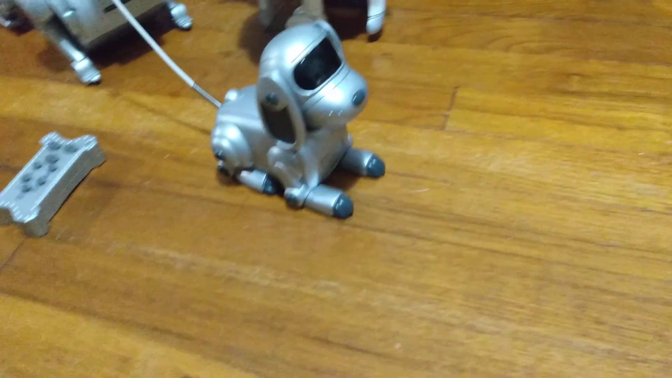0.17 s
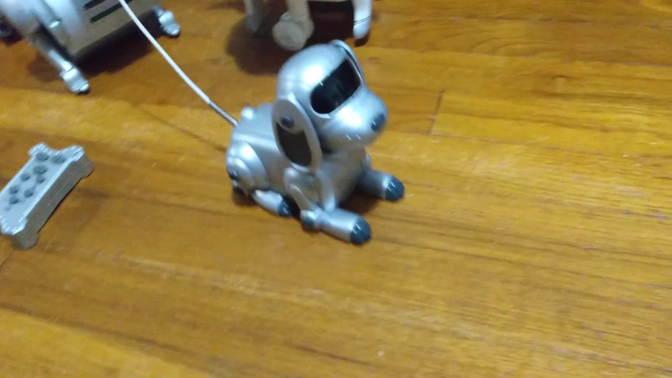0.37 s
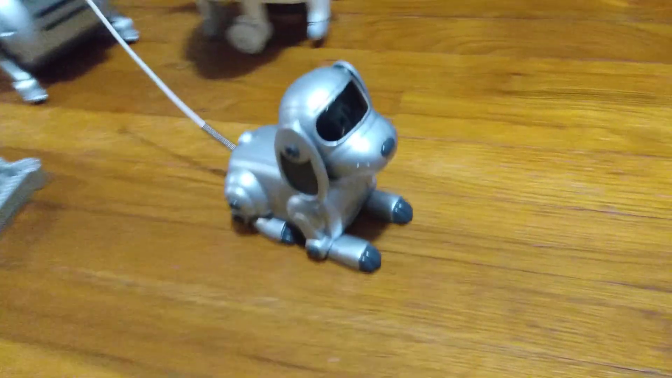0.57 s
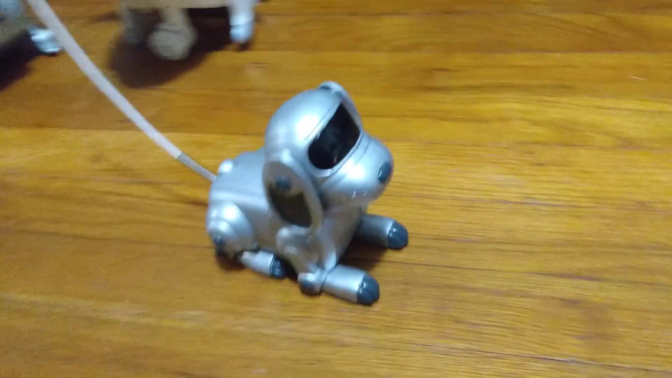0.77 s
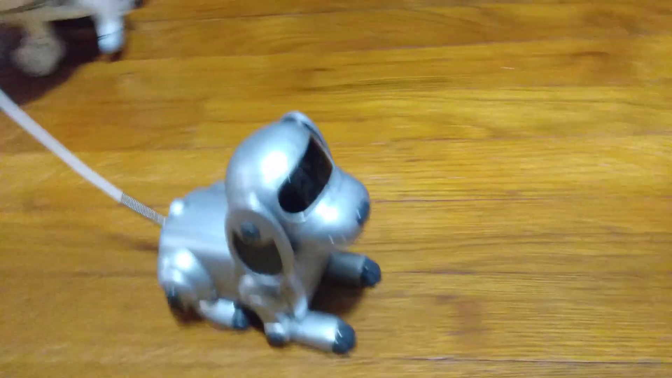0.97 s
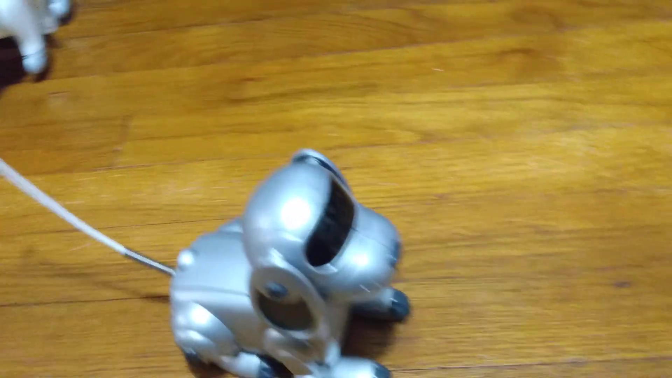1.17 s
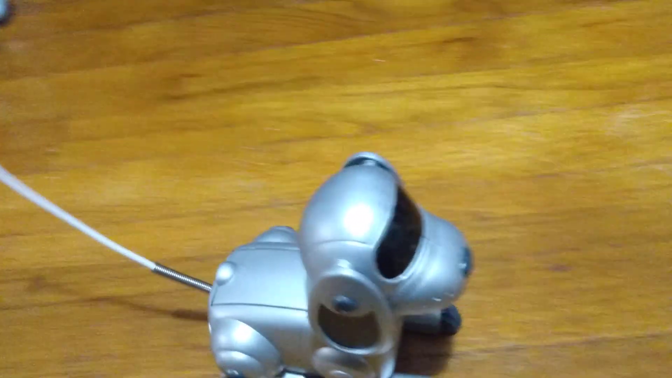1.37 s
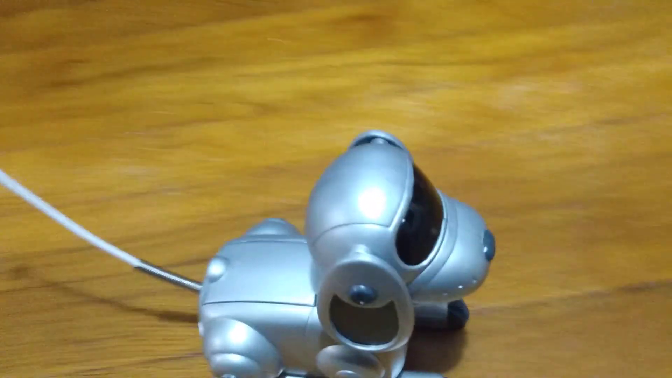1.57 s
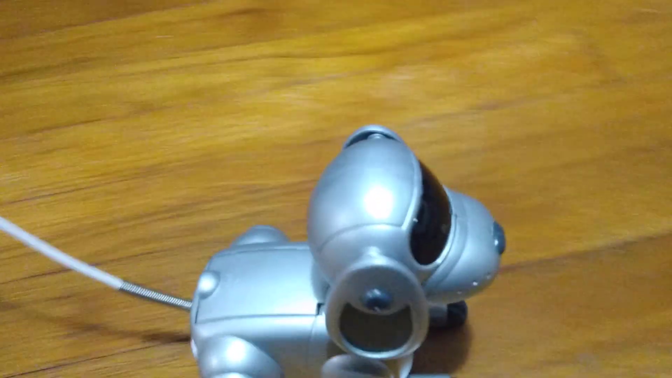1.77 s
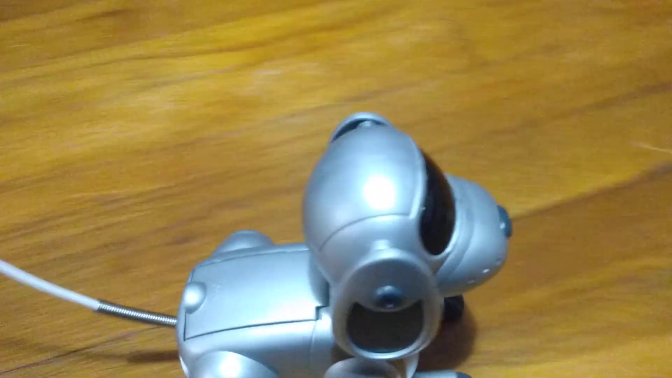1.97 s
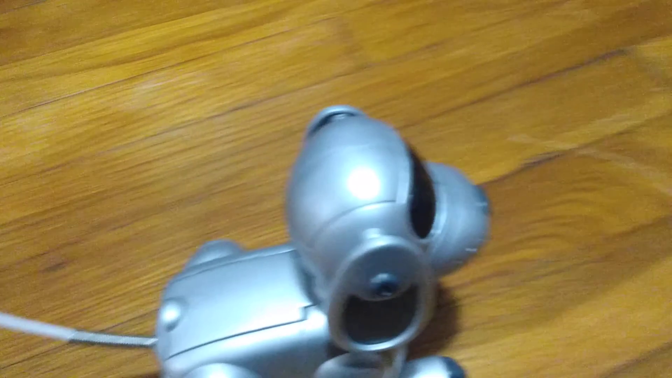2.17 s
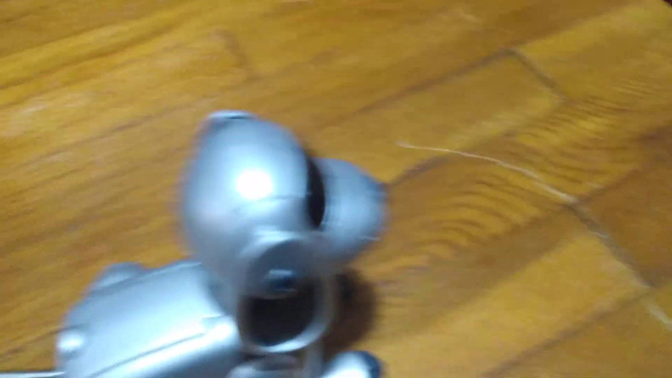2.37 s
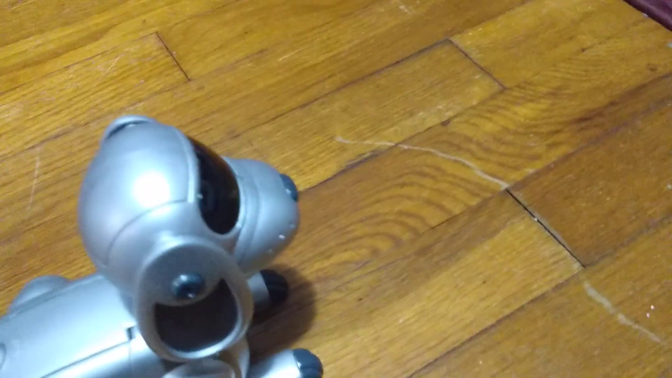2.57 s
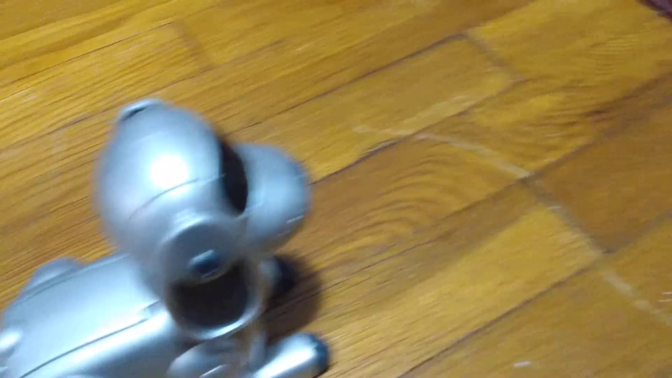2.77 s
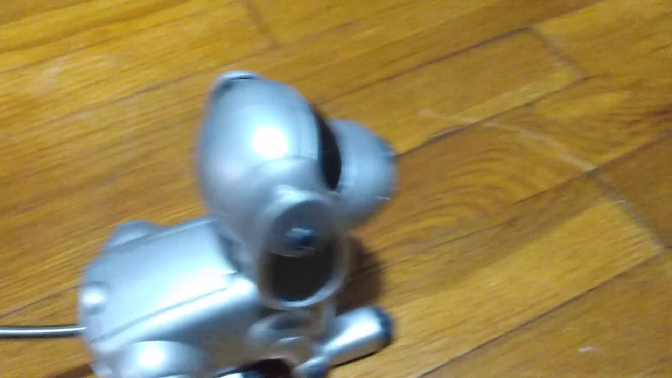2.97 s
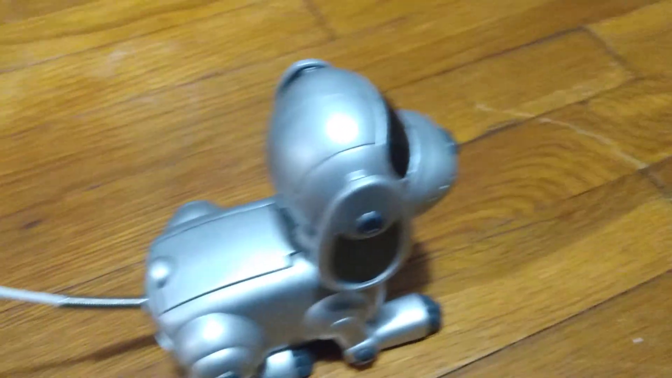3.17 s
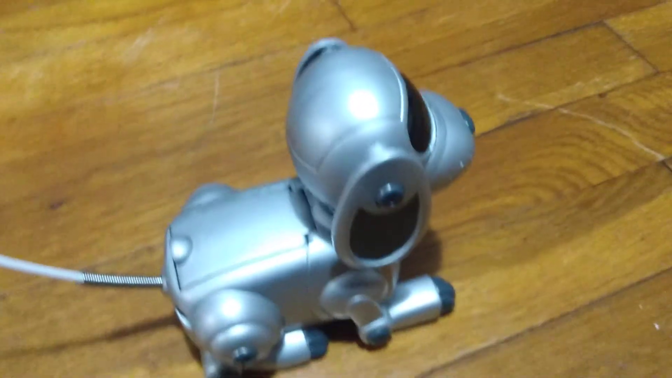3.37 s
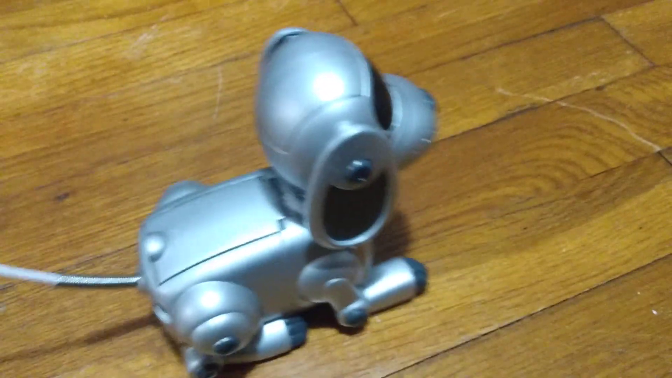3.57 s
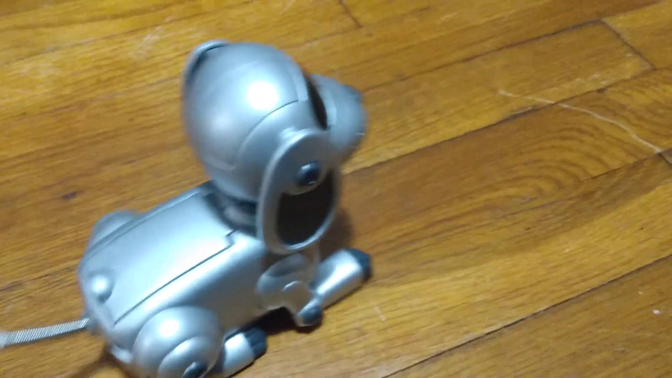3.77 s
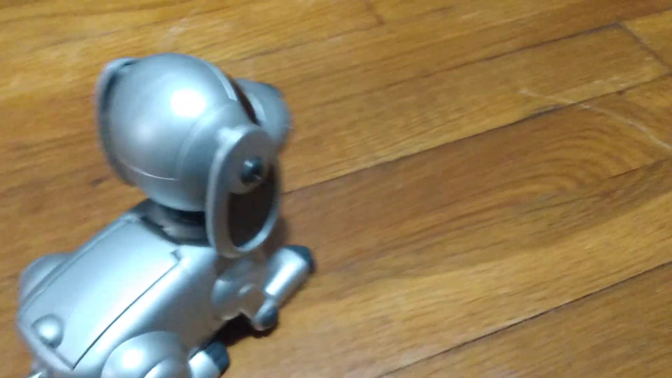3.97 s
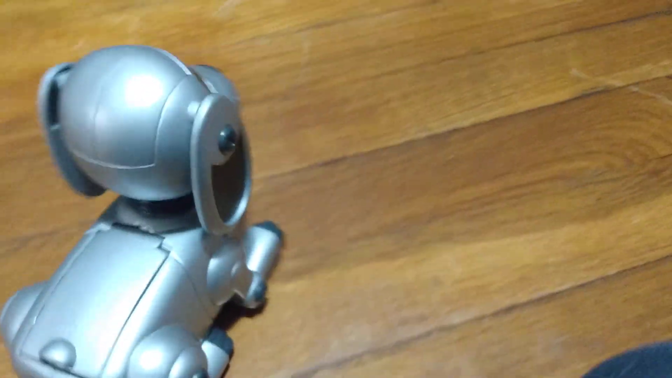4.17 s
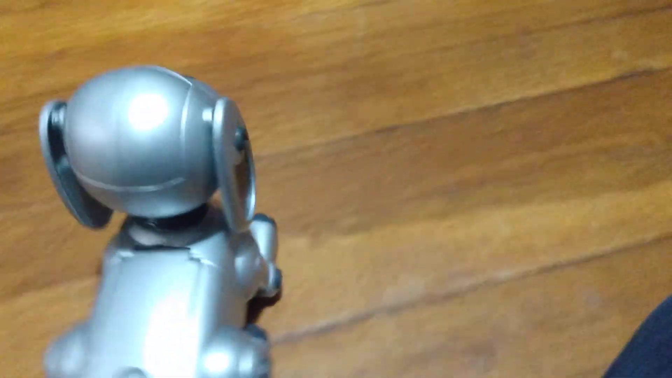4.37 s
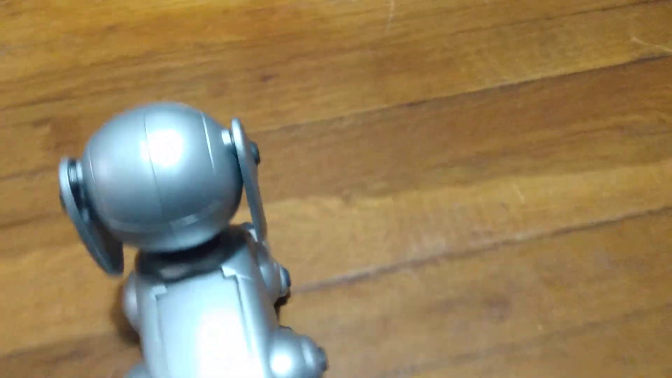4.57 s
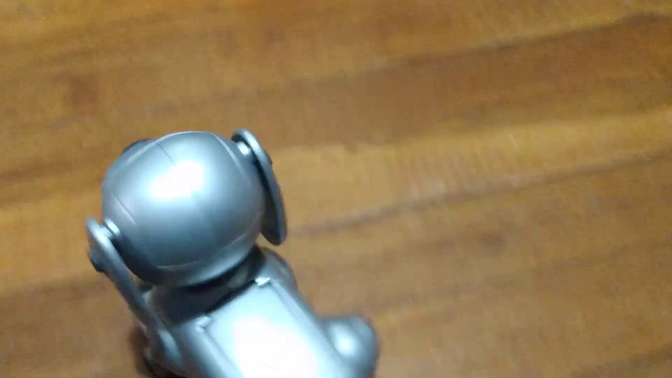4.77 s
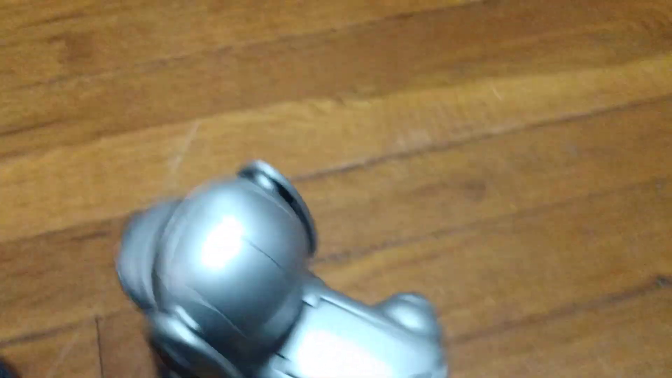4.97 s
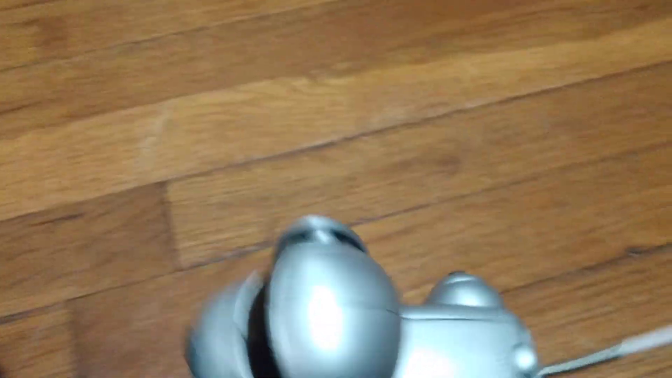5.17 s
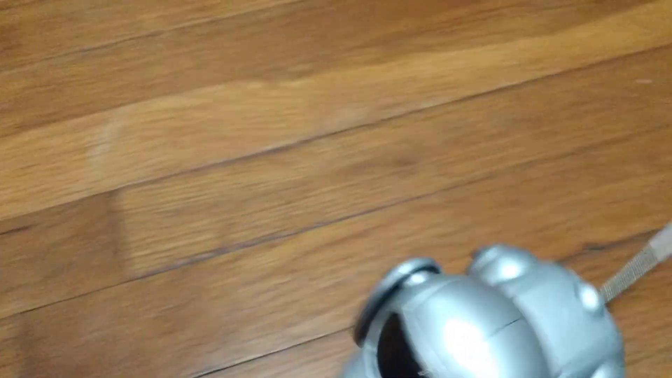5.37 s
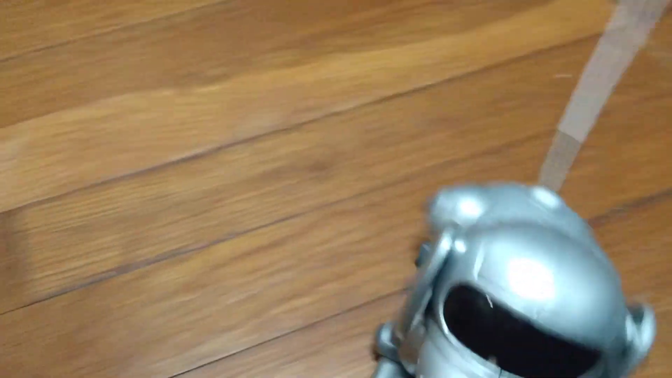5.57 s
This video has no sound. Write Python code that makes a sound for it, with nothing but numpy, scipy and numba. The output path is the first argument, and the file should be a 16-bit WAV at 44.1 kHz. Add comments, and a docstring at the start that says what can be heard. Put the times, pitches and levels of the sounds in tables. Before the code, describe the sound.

Close to a phone microphone in a quiet room, two faint knocks lead into a hollow plastic toy trundling over floorboards. Low woody rumble, dry rattles and small thuds build, with one sharp snap. It stops for about a second, leaving faint hiss and hum, then a second burst grows with harder knocks and more scrapes, running to the end.

```python
"""A hard plastic toy dog trundles over floorboards in two bursts, close to a phone in a quiet room.
Two small knocks open it; then the first burst builds up: rolling bumps ring the boards and the hollow shell,
loose shell parts rattle in short clusters, a part scrapes, the body knocks and thuds, a plate snaps.
After about 2.5 s it pauses, with only a few faint ticks and the room's hiss and hum.
From about 3.5 s the second burst builds up from the same sounds and runs to the end, with more scrapes."""
import sys
import numpy as np
from scipy import signal
from scipy.fft import rfft, irfft
from scipy.io import wavfile
from scipy.ndimage import uniform_filter1d
from numba import njit

SR = 44100
rng = np.random.default_rng(int(sys.argv[2]) if len(sys.argv) > 2 else 0)


def to_wav(s):
    """Save 16-bit WAV."""
    ch = np.atleast_2d(s).T  # columns
    pcm = np.round(np.clip(ch, -1, 1) * 32767)  # PCM
    wavfile.write(sys.argv[1], SR, pcm.astype(np.int16))


N = 247840  # samples, about 5.6 s


def undb(db):
    """Decibels to gain."""
    return 10 ** (np.asarray(db) / 20)


def level(x, db):
    """Scale a sound to an average (rms) level in dB."""
    return x * undb(db) / np.sqrt(np.mean(x ** 2))


def read(tables, count):
    """Turn tables into smooth curves; the first count columns are dB levels, silent outside the tables."""
    t = np.arange(N) / SR
    start_s, *columns = np.transpose(np.vstack(tables))
    inside = sum((t >= rows[0][0]) & (t <= rows[-1][0]) for rows in tables)
    gate = uniform_filter1d(1. * inside, size=160)  # soft edges
    curves = [np.interp(t, start_s, column) for column in columns]
    return [gate * undb(curve) if k < count else curve for k, curve in enumerate(curves)]


@njit
def svf(x, hz, width):
    """State-variable band-pass filter: a resonance whose centre can move, gain 1 at the centre."""
    y, band, low = np.empty(len(x)), 0., 0.
    for i in range(len(x)):
        g, k = np.tan(np.pi * hz[i] / SR), width / hz[i]
        v = (band + g * (x[i] - low)) / (1 + g * (g + k))
        band, low, y[i] = 2 * v - band, low + 2 * g * v, k * v
    return y


def ring(x, modes, steep=False):
    """Ring several resonances at their own levels; steep adds a second, wider pass to each."""
    out = 0
    for k, (hz, width, db) in enumerate(modes):
        centre = np.full(len(x), 1. * hz)
        y = svf(x, centre, 1. * width)
        if steep:
            y = svf(y, centre, 5.07 * width)
        sign = (-1) ** k  # neighbours have opposite polarity
        out = out + sign * undb(db) * y / np.sqrt(width)
    return out


def walk(rate):
    """A smooth random wander: a new draw every 1 / rate s, averaged twice; spread near 1."""
    k = int(SR / rate)
    steps = np.repeat(rng.standard_normal(N // k + 1), k)
    return 1.6 * uniform_filter1d(uniform_filter1d(steps, k), k)[:N]


def bumps(rate, spread_db):
    """Random tiny impacts of uneven size, about rate of them per second."""
    hit = rng.random(N) < rate / SR
    size = undb(spread_db * rng.exponential(size=N))
    return hit * rng.standard_normal(N) * size + 1e-18  # the tiny offset keeps the filters fast


def add(out, s, sound, db):
    """Mix a sound in at its time and peak level."""
    i = int(s * SR)
    out[i:i + len(sound)] += (sound * undb(db) / np.abs(sound).max())[:N - i]


# How strongly the toy rolls, one table per burst; each layer also has a fixed trim:
# start_s, low_boards_db, upper_boards_db, shell_drone_db
ROLL = [
    [(0.0, -88, -93, -69), (0.04, -63.5, -68.5, -62.5), (0.16, -86, -79.5, -77.5), (0.59, -53.5, -60, -63),
     (0.79, -66, -62, -69), (0.93, -49, -55.5, -61), (1.16, -48, -50.5, -52), (1.18, -52, -58, -60.5),
     (1.3, -51.5, -54.5, -56.5), (1.37, -53, -59, -56), (1.41, -50.5, -51.5, -56),
     (1.54, -46.5, -49, -56.5), (1.64, -53, -56.5, -56.5), (1.66, -49, -54, -55), (1.7, -46, -48, -52),
     (1.84, -58, -51, -54), (1.9, -45, -45.5, -52), (1.99, -56.5, -50.5, -55), (2.19, -43.5, -45, -54),
     (2.2, -50, -51.5, -58), (2.3, -56.5, -50.5, -63), (2.35, -49, -51, -64), (2.5, -82.5, -90, -84),
     (2.6, -90, -81, -77)],
    [(3.5, -80, -81, -80), (3.6, -92, -84, -86), (3.65, -65, -73, -76), (3.88, -66, -63.5, -70.5),
     (4.04, -49.5, -51.5, -54.5), (4.1, -59, -51.5, -60.5), (4.13, -46, -51, -59), (4.2, -49, -50, -54),
     (4.38, -47.5, -48, -51.5), (4.45, -64, -61, -65), (4.53, -43, -49, -57.5), (4.61, -54, -50.5, -63),
     (4.77, -45, -45, -53.5), (4.8, -55, -42.5, -49), (4.87, -42.5, -39.5, -52), (5.02, -51.5, -50, -56),
     (5.07, -43.5, -42, -59.5), (5.12, -56, -50.5, -60), (5.19, -45.5, -50, -57), (5.23, -58, -51, -56.5),
     (5.35, -49, -50.5, -55), (5.52, -50.5, -54.5, -53.5), (5.54, -42.5, -49, -52.5), (5.62, -69, -62, -56)],
]
# The board pitches nearest the toy as it moves, one table per burst: start_s, low_pitch_hz, upper_pitch_hz
BOARD_PITCHES = [
    [(0.3, 136, 183), (0.45, 121.1, 177), (0.92, 135.3, 179), (1.22, 104.1, 185), (1.33, 136, 185),
     (1.51, 108.7, 183), (1.57, 112, 262), (2.05, 126, 219), (2.11, 103, 221), (2.27, 112, 248),
     (2.45, 137, 175)],
    [(3.65, 115, 228), (3.704, 126.6, 203), (4.006, 106, 238), (4.334, 110.2, 199), (4.438, 127, 234),
     (4.538, 96.6, 232), (4.696, 109.2, 236), (4.838, 82.2, 210), (5.036, 114.9, 211), (5.404, 82.1, 197),
     (5.62, 109.5, 243)],
]
# Resonances of the boards and the hollow shell: pitch_hz, width_hz (of one pass), level_db (before width scaling)
LOW_BOARDS = [(86.4, 19.6, 4), (101.3, 24, 4), (132.3, 45.5, 3)]
UPPER_BOARDS = [(187.4, 37, 0.094), (256.8, 20, -0.37), (317.7, 48, 0.71)]
SHELL = [(428, 203, -2), (752, 140, -5), (874.5, 54, -3.5), (1140, 130, -2.5), (1310, 210, -0.5),
         (1760, 840, 1)]


def rolling():
    """The wood grain jolts the toy; the jolts ring the boards and drone in the hollow shell."""
    low, upper, shell = read(ROLL, count=3)
    low_hz, upper_hz = read(BOARD_PITCHES, count=0)
    jolts = bumps(rate=1200, spread_db=1.7)
    boards = low * level(ring(jolts, LOW_BOARDS, steep=True), -1.7)
    boards += low * level(hum(low_hz, waver=0.0835, rate=30, flutter_db=0.5), -0.85)
    boards += upper * level(ring(jolts, UPPER_BOARDS, steep=True), -3.0)
    boards += upper * level(hum(upper_hz, waver=0.0819, rate=60, flutter_db=-1.0), -3.5)
    drone = ring(jolts, SHELL) * undb(0.78 * walk(37))
    return boards + shell * level(drone, 0.095)


def hum(hz, waver, rate, flutter_db):
    """The board mode that rings strongest under the toy: a tone that wavers in pitch and strength."""
    strength = undb(flutter_db * walk(rate))
    wavering_hz = hz * (1 + waver * walk(rate))
    return strength * np.sin(2 * np.pi * np.cumsum(wavering_hz) / SR)


# Rattles of loose shell parts; fixed trims shift each layer's level:
# start_s, level_db, main_pitch_hz, treble_db (relative to level), low_ring_db (relative to level), length_ms
RATTLES = [(0.2839, -50, 2680, -14, -4.5, 4.4), (0.348, -58, 2560, -27, -8, 4.4),
           (0.4075, -60.5, 3340, -19, -4, 4.4), (0.509, -45.5, 3300, -25, -16, 4.8),
           (0.5501, -45, 3400, -22, -11, 4), (0.5658, -37.5, 3300, -20, -18, 4.4),
           (0.5879, -35, 3330, -15, -15, 4.4), (0.6154, -44, 3350, -18, -9, 5.1),
           (0.7692, -44, 4250, -8, -19, 4.4), (0.8031, -47, 4100, -19, -20, 4.4),
           (0.8598, -43, 3320, -22, -17, 4.4), (0.8777, -39, 4200, -9.5, -13, 5),
           (0.8952, -38.5, 3850, -19, -18, 4.4), (0.9208, -40, 4190, -21.5, -16, 4),
           (0.9518, -35.5, 3360, -13, -22, 4.4), (1.0011, -40.5, 3350, -12, -16, 4.4),
           (1.0296, -36.5, 3400, -8.5, -15, 4.2), (1.0407, -40, 4950, -9, -11, 4.4),
           (1.05, -36.5, 3500, -20, -12, 3.9), (1.075, -33, 2780, -14, -15, 4.4),
           (1.1027, -32.5, 3470, -16, -16.5, 4.4), (1.1967, -40.5, 3340, -20, -9, 4),
           (1.2087, -39, 3570, -18, -17, 4.4), (1.2426, -40, 2808, -16, -16, 4.4),
           (1.2497, -35.5, 4050, -18, -16, 4.4), (1.287, -32.5, 3600, -9.5, -14, 5),
           (1.3149, -36, 3340, -15, -15, 4.4), (1.3937, -40.5, 2820, -24, -5.5, 5.2),
           (1.4056, -33.5, 2560, -22, -10.5, 4.7), (1.4255, -31.5, 2720, -21, -13, 4),
           (1.478, -29, 3440, -25.5, -22, 4.4), (1.504, -30.5, 3400, -8.5, -18, 3.9),
           (1.534, -33.5, 3350, -11, -20, 4), (1.5713, -30, 3790, -18, -21, 4.3),
           (1.5843, -30, 3410, -8, -17, 3.9), (1.6044, -29, 3360, -20, -3, 4.4),
           (1.6182, -32.5, 3400, -14, -21.5, 4.4), (1.6477, -38, 3360, -11, -14, 4.4),
           (1.6583, -34, 3354, -14, -16.5, 4.4), (1.6818, -34, 3350, -15, -18, 4.7),
           (1.7127, -31.5, 3380, -16, -15, 4.1), (1.7237, -37, 2500, -17, -14, 4.4),
           (1.7413, -31.5, 3350, -28, -17, 5), (1.8283, -31.5, 3330, -16, -17.5, 4.8),
           (1.8648, -27, 3730, -16, -28, 4.4), (1.8981, -30, 3300, -13.5, -18, 3.7),
           (1.931, -32.5, 4560, -8, -4, 3.6), (1.971, -32, 3340, -16, -21, 4.8),
           (2.0021, -35.5, 4240, -24.5, -19, 4.4), (2.0722, -39, 3744, -25, -13.5, 3.7),
           (2.087, -30.5, 3720, -27, -11, 4.4), (2.0957, -32, 4230, -21, -20, 4.4),
           (2.1164, -34.5, 3360, -14, -16, 4.4), (2.1373, -30.5, 3368, -20, -17, 4.4),
           (2.1536, -35, 3750, -14, -18, 4.4), (2.1642, -34, 3380, -16, -21, 3.4),
           (2.173, -28, 3350, -14, -21, 4.4), (2.1974, -34, 3340, -12, -20, 4.5),
           (2.2321, -42.5, 3630, -27, -15, 4.9), (2.2594, -40, 3660, -30, -18, 4.9),
           (2.2832, -60, 3310, -18, -9, 4.3), (2.3114, -40, 3150, -29, -20, 4.2),
           (2.3254, -44.5, 4390, -17, -10, 4.4), (2.5713, -57, 4660, -31, 4, 4.4),
           (2.581, -53.5, 3980, -28, -17, 4.4), (3.3755, -49.5, 3890, -32, 0, 4.4),
           (3.523, -59, 2500, -5, -6, 4.4), (3.6607, -50, 3490, -25, -17, 4.4),
           (3.8587, -51, 3750, -28, -13, 4.4), (3.8876, -47.5, 3060, -33, -11, 4.4),
           (3.9679, -45, 3710, -27, -4.5, 4.1), (3.9945, -35.5, 3710, -19.5, -18, 4.8),
           (4.0226, -43, 2800, -18, -4.5, 4.4), (4.0553, -38, 3280, -18, -10, 4.8),
           (4.1162, -34, 3260, -6, -23, 4.4), (4.1254, -35, 3300, -14, -17, 4.4),
           (4.1526, -36, 2690, -11, -22, 4.7), (4.1614, -39.5, 4418, -14, -18, 4.8),
           (4.1741, -33, 3330, -15, -25, 5), (4.1844, -36, 3330, -17, -17, 4.4),
           (4.2462, -32.5, 3340, -11.5, -11, 4.43), (4.2669, -35, 3197, -9, -5, 4.4),
           (4.2923, -31.5, 3210, -10, -12, 4.4), (4.335, -35, 3110, -28, -13, 4.4),
           (4.3443, -37, 3300, -10, -4, 5.5), (4.362, -42, 2870, -34, -11, 4.4),
           (4.4064, -37.5, 3110, -28, -14, 4.4), (4.413, -37, 3050, -21, -9, 4.4),
           (4.5064, -30, 3130, -19.5, -26.5, 4.1), (4.5164, -30.5, 3040, -18, -13, 4.4),
           (4.5406, -37, 2970, -17, -18, 4.1), (4.565, -37, 3560, -11, -24, 4.4),
           (4.6177, -33, 3550, -15, -20, 5.1), (4.6539, -41, 3140, -16, -11, 4.4),
           (4.6677, -28.5, 3190, -29, -15, 4.6), (4.6923, -34.5, 3180, -22, -15, 4.8),
           (4.7363, -32.5, 3170, -18, -16, 5.2), (4.7958, -30, 3440, -11, -12.5, 3.9),
           (4.8082, -30.5, 3182, -18.5, -7.5, 4.1), (4.8484, -24.5, 3390, -12, -15, 5.4),
           (4.8606, -28.5, 4900, -25, -13, 4.4), (4.8691, -31, 3330, -15, -15, 4.37),
           (4.8807, -35.5, 3450, -15, -20, 3.9), (4.9197, -34.5, 4207, -12, -16, 4.54),
           (4.9352, -36.5, 3430, -15, -5, 4.4), (4.9534, -39, 3610, -17, -12, 4),
           (5.0205, -38.5, 3470, -13, -12, 4.4), (5.0324, -40, 3180, -16, -12, 4.4),
           (5.0552, -35, 3580, -18, -13, 4.45), (5.0634, -39.5, 3300, -6, -16, 4.4),
           (5.0718, -34.5, 4650, -11, -24, 5.8), (5.1343, -39.5, 3260, -20, -20, 4.4),
           (5.1528, -42, 4740, -13, -15, 4.4), (5.17, -28.5, 4090, -13.5, -24, 4.4),
           (5.1798, -34, 3300, -23, -15, 4.37), (5.2133, -33, 3160, -19, -15, 3.6),
           (5.254, -35, 3260, -15, -15, 3.9), (5.2644, -39, 2740, -18, -12, 4.45),
           (5.283, -45, 2750, -9, -10, 4), (5.3127, -33, 4030, -14, -19, 4.6),
           (5.338, -34, 3599, -17, -19, 4.9), (5.3487, -30.5, 3580, -18, -19.5, 4.1),
           (5.3641, -34, 3233, -18, -16, 4.4), (5.3834, -36, 3340, -19, -14, 4.45),
           (5.401, -40, 3140, -19, -13, 4.4), (5.4227, -38, 3120, -28, -18, 4.4),
           (5.444, -28.5, 2810, -26, -17, 4.5), (5.4864, -32, 3370, -28, -18, 4.3),
           (5.5026, -28.5, 2800, -28, -18, 5.4), (5.524, -28.5, 2860, -42, -20, 4.4),
           (5.543, -39, 3080, -25, -10, 5.1)]
# Resonances of the rattling parts: pitch_hz, width_hz (of one pass), level_db (before width scaling)
RATTLE_BODY = [(3316, 138, 0.5), (3690, 2620, -1), (5260, 2700, -3)]
RATTLE_TREBLE = [(6000, 900, -3), (7450, 450, 0)]


def rattles():
    """Each rattle is a few milliseconds of quick contacts that ring the shell parts, then sparse rebounds."""
    out, t = np.zeros(N), np.arange(2400) / SR
    for s, db, hz, treble_db, low_db, ms in RATTLES + small_rattles():
        chance = rng.standard_normal((4, len(t)))
        length = ms / 1000
        swell = np.minimum(t / (0.088 * length), 1) * np.exp(-1.6 * (t / length) ** 2)
        # rebounds: only the rare strong draws touch, ever more weakly
        rebounds = (chance[3] > 1.9) * np.minimum(t / length, 1) * np.exp(-t / .011)
        main_modes = [(hz, 500, 1.5)] + RATTLE_BODY
        main = ring((swell + 2.73 * rebounds) * chance[0], main_modes, steep=True)
        treble = ring((swell + rebounds) * chance[1], RATTLE_TREBLE, steep=True)
        low = ring(swell * chance[2], [(1670, 1300, 0)], steep=True)
        add(out, s, main, db - 2.5)
        add(out, s, treble, db + treble_db + 1.5)
        add(out, s, low, db + low_db + 4)
    return out


# How hard the loose parts shake, one table per burst; fixed trims follow: start_s, chatter_db, treble_db
SHAKE = [
    [(0.4, -76, -92), (0.85, -66.5, -83), (0.97, -57, -68), (1.1, -55.5, -69), (1.29, -53, -73),
     (1.55, -53, -62), (1.79, -55.5, -66.5), (1.92, -51, -64), (2.05, -53.5, -68), (2.19, -59, -62),
     (2.33, -63, -81), (2.45, -79, -89)],
    [(3.4, -88, -90), (3.91, -64, -87), (4.02, -55, -79), (4.17, -55.5, -71.5), (4.34, -53, -71),
     (4.63, -56, -73), (4.72, -57, -72), (4.92, -55, -74), (5.25, -55.5, -71), (5.38, -47.5, -68),
     (5.51, -53.5, -70), (5.62, -58, -77)],
]


def small_rattles():
    """Rows for the lesser rattles: at random moments, with levels that follow how hard the toy shakes."""
    per_s, treble_db, low_db, length_ms = 9.1, -17, -8.5, 3.6
    shake = read(SHAKE, count=2)[0]
    rows = []
    for when, size, pitch in rng.random((int(per_s * N / SR), 3)):
        shake_db = 20 * np.log10(shake[int(when * N)] + 1e-9)
        db = shake_db + 5.5 + 12.0 * size
        pitch_hz = 2562 + 1281 * pitch
        rows.append((when * N / SR, db, pitch_hz, treble_db, low_db, length_ms))
    return rows


def chatter():
    """Dense tiny contacts of loose parts ring modes shared with the rattles, plus two lower ones."""
    middle, treble = read(SHAKE, count=2)
    ticks = bumps(rate=1800, spread_db=2.0) * undb(2.4 * walk(90))
    body_modes = [(2038, 120, 2.6), (2830, 150, -0.45)] + RATTLE_BODY[:2]
    body = level(ring(ticks, body_modes), -4.1)
    bright = level(ring(ticks, RATTLE_BODY[2:] + RATTLE_TREBLE, steep=True), -3.0)
    return middle * body + treble * bright


# Scrapes of a part: start_s, length_ms, level_db (at the start, before a fixed trim), start_pitch_hz, end_pitch_hz
SCRAPES = [(1.39, 86, -40, 2170, 2230), (2.075, 160, -49.5, 2870, 3160), (4.245, 190, -43.5, 3090, 3060),
           (4.335, 55, -41, 3180, 3090), (4.405, 82, -37, 3170, 2770), (4.6, 190, -47, 2960, 3240),
           (5.172, 94, -40, 3170, 2850), (5.335, 100, -44.5, 3250, 2990), (5.44, 97, -39, 2930, 2800),
           (5.521, 66, -34.5, 3020, 2760)]


def scraping():
    """Stick-slip friction throbs in a narrow resonance that glides through each scrape."""
    attack_s, release_s, sag_db = 0.006, 0.022, -9
    t = np.arange(N) / SR
    gain, hz = np.zeros(N), np.full(N, 3000.)
    for s, ms, db, start_hz, end_hz in SCRAPES:
        end = s + ms / 1000
        shape = np.clip(np.minimum((t - s) / attack_s, (end - t) / release_s), 0, 1)
        progress = np.clip((t - s) / (end - s), 0, 1)
        gain = gain + undb(db + sag_db * progress) * shape
        hz = np.where(shape > 0, np.interp(t, [s, end], [start_hz, end_hz]), hz)
    throb_db = 2.4 * walk(140) + 1.56 * walk(35)  # a fast and a slow wander
    slips = bumps(rate=2000, spread_db=0.0) * undb(throb_db)
    centre = hz * (1 + 0.031 * walk(70))
    tone = svf(svf(slips, centre, 520.), centre, 1700.0)
    return gain * level(tone, -2.5)


def blows(table, partner, share):
    """A soft push swells and fades over a few cycles of one mode and a weaker partner above it."""
    out = np.zeros(N)
    for s, db, hz, cycles in table:
        turn = np.arange(int(4 * cycles * SR / hz)) * hz / SR  # cycles so far
        u = 3 * turn / cycles
        tone = np.sin(2 * np.pi * turn) + share * np.sin(2 * np.pi * partner * turn)
        add(out, s, u * np.exp(-u) * tone, db)
    return out


# Knocks on the shell: start_s, peak_db, pitch_hz, length_cycles (strongest a third of the way in)
KNOCKS = [(0.018, -55, 844, 5.1), (0.064, -43.5, 700, 4.5), (0.287, -59, 740, 3.2), (0.447, -51, 700, 1.8),
          (0.504, -50, 674, 1.3), (0.554, -47, 705, 5.6), (0.578, -49, 724, 4.5), (0.609, -48, 690, 2.7),
          (1.045, -39.5, 760, 4.7), (1.077, -39, 722, 4), (1.096, -47, 654, 2.8), (1.143, -43, 686, 3.7),
          (1.605, -30, 606, 1.56), (1.765, -42, 1000, 3.5), (1.79, -40.5, 1100, 3.74),
          (4.21, -49.5, 820, 3.9), (4.285, -38, 868, 8.7), (4.407, -40.5, 445, 2.9), (4.834, -39, 963, 5),
          (4.858, -36, 894, 6.9), (4.885, -42, 900, 6.2), (4.913, -39.5, 893.5, 7.5),
          (4.949, -31, 908, 4.7)]


def knocks():
    """Blows on the shell ring one shell mode and a partner half again as high."""
    return blows(KNOCKS, partner=1.5, share=0.21)


# Thuds into the boards: start_s, peak_db, pitch_hz, length_cycles (strongest a third of the way in)
THUDS = [(0.023, -65, 155, 3.4), (1.283, -34, 219, 0.85), (1.448, -39, 180, 2.1), (1.606, -40, 58, 1.6),
         (2.174, -47.5, 226, 3.8), (4.385, -29.5, 367, 1.03), (4.505, -37.5, 225, 5.5),
         (4.796, -26, 270, 2.28), (4.81, -48, 188.9, 3.4), (4.847, -25.5, 234, 2.2),
         (5.123, -39.5, 345, 2.9)]


def thuds():
    """Blows into the boards ring one low board mode and a weaker partner above."""
    return blows(THUDS, partner=1.416, share=0.24)


# Snaps that fall in pitch: start_s, peak_db, start_pitch_hz, end_pitch_hz, length_ms
SNAPS = [(0.4456, -50, 1870, 506, 3), (1.283, -43.5, 2000, 250, 7), (1.6051, -23, 4080, 860, 3.1),
         (2.445, -47, 3040, 2830, 4.1), (2.7678, -56, 3050, 2900, 5.5), (4.372, -35, 1547, 492, 4.4)]


def snaps():
    """A bent plate lets go; its treble arrives first, so the pitch falls."""
    out = np.zeros(N)
    for s, db, start_hz, end_hz, ms in SNAPS:
        samples = ms * SR / 1000
        u = np.arange(int(samples)) / samples  # 0 to 1 through the snap
        hz = start_hz * (end_hz / start_hz) ** u
        fade = np.minimum(u / 0.059, 1) * (1 - u) ** 1.1
        add(out, s, fade * np.sin(2 * np.pi * np.cumsum(hz) / SR), db)
    return out


@njit
def walls(x, lags, gain, damp):
    """Eight delay lines that feed each other, duller on every round."""
    line, soft, out = np.zeros((8, 4096)), np.zeros(8), np.zeros(len(x))
    for i in range(len(x)):
        total = 0.
        for k in range(8):
            soft[k] += (1 - damp) * (gain[k] * line[k, (i - lags[k]) & 4095] - soft[k])
            total += soft[k]
        out[i] = total
        for k in range(8):
            line[k, i & 4095] = x[i] + soft[k] - total / 4
    return out


def room_echo(toy):
    """Sound bounces between the walls and loses strength and treble on each trip."""
    fade_s = 0.3  # time to fall 60 dB, before the treble damping
    lags = np.array([331, 487, 641, 809, 997, 1201, 1429, 1693])  # samples per trip
    gain = undb(-60 * lags / SR / fade_s)
    return undb(-20) * walls(toy + 1e-18, lags, gain, 0.11)


# Tone colour of the room's air; only the differences count: pitch_hz, level_db (per Hz)
ROOM_AIR = [(25, -31.5), (45, -6.5), (130, -6), (250, -9.5), (490, -9), (650, -13), (1000, -12),
            (1400, -16), (2500, -13.5), (3400, -18), (4200, -23), (5200, -31.5), (7600, -34), (9000, -39.5)]


def room_air():
    """Steady distant hiss and hum of the house: noise shaped in tone, with a slight slow wander in level."""
    hz, db = np.transpose(ROOM_AIR)
    shape_db = np.interp(np.log(np.fft.rfftfreq(N, 1 / SR) + 1), np.log(hz), db)
    noise = irfft(rfft(rng.standard_normal(N)) * undb(shape_db), N)
    return level(noise * undb(0.81 * walk(3.304)), -66.5)


def scene():
    """The toy, its echo in the room and the room's own air; the rolling and chatter get no echo."""
    toy = scraping() + rattles() + knocks() + thuds() + snaps()
    mix = toy + chatter() + rolling() + room_echo(toy) + room_air()
    return mix[None]  # one channel


def record(dry):
    """The phone's microphone path drops deep bass and high treble; only a faint converter hiss lies above."""
    band_hz, top_hz, hiss_db = 9254, 15500, -100
    soft = signal.sosfilt(signal.butter(8, 7900, fs=SR, output="sos"), dry)
    soft = signal.sosfilt(signal.butter(2, 50, "high", fs=SR, output="sos"), soft)
    band = signal.sosfilt(signal.cheby2(10, 50, band_hz, fs=SR, output="sos"), soft)
    hiss = level(rng.standard_normal(N), hiss_db)  # level before the last filter
    return signal.sosfilt(signal.ellip(8, .2, 60, top_hz, fs=SR, output="sos"), band + hiss)


dry = scene()
out = record(dry)
to_wav(out)
```